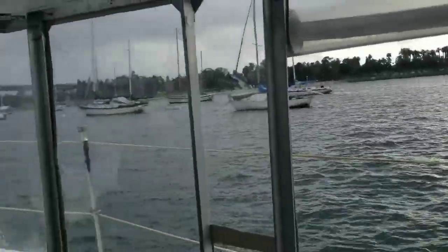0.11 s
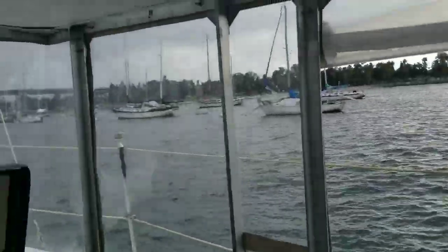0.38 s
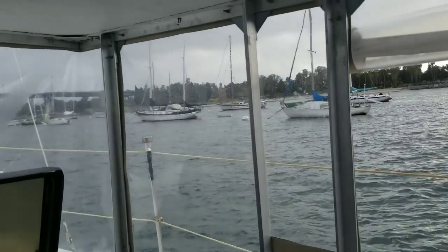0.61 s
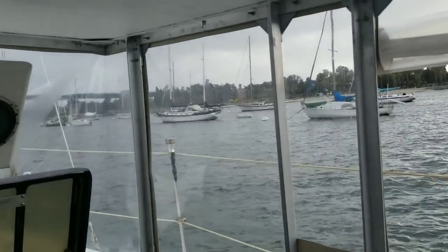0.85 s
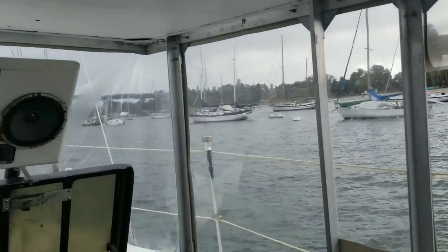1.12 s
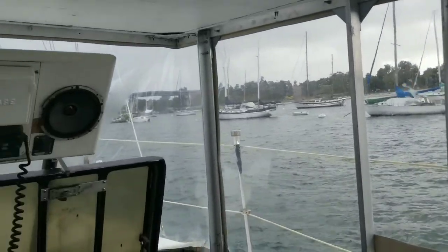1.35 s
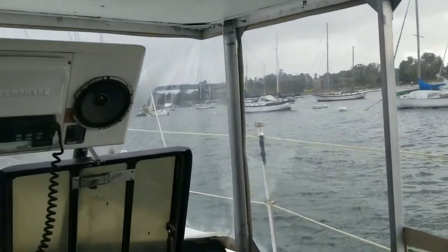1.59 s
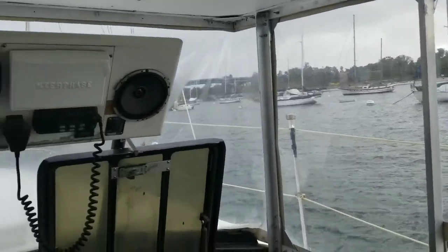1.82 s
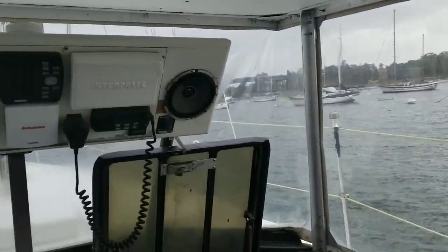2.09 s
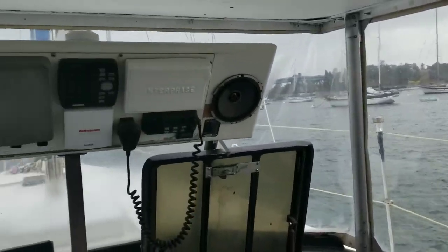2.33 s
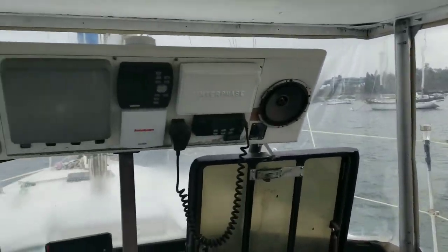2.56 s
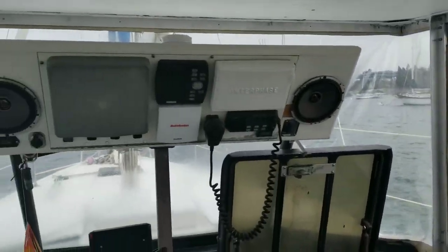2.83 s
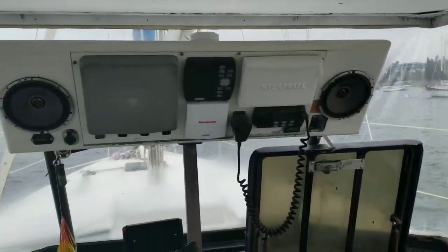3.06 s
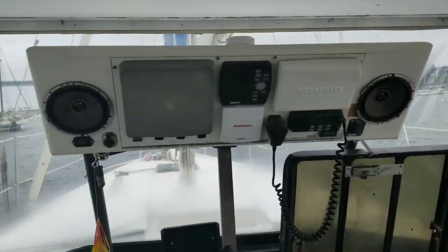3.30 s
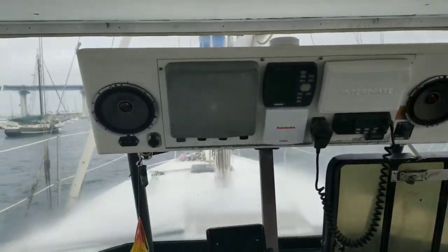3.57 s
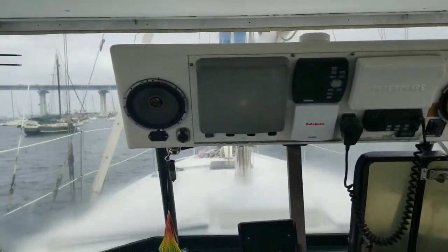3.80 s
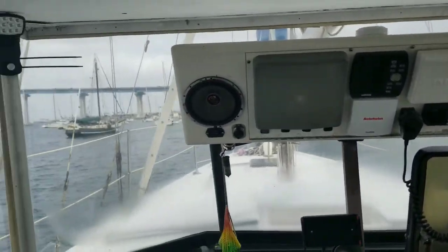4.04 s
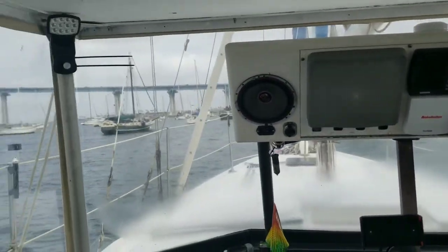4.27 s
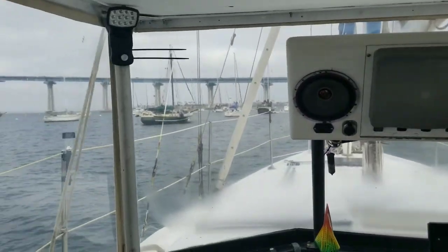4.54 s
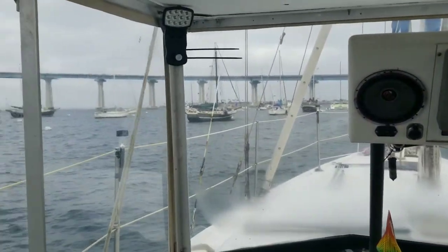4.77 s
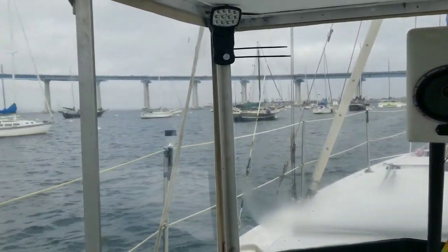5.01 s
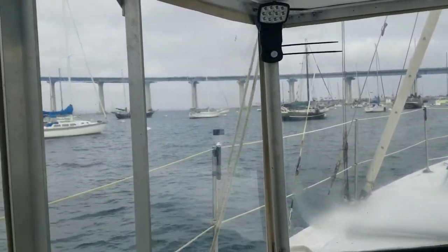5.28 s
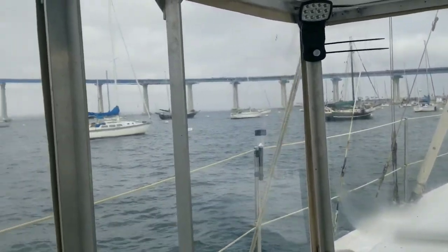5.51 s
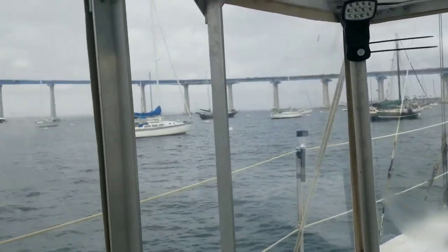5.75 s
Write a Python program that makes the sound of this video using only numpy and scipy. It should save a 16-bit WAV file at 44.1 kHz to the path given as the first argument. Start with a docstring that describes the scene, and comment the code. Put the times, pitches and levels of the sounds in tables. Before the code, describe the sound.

A helicopter's deep, fast blade throb swells and sharpens over a moored boat while small waves lap, splash and knock at the hull.

```python
"""A helicopter comes towards a moored boat; the microphone stands in the canvas-and-plastic cockpit shelter.
Main-rotor slaps and a geared tail rotor are summed from tones that interfere with their reflections off the
water, over a rumble of shaped noise. Wavelets lap (bubble grains and noise), spray (bright noise) and splash
(drops ringing bubbles) by the hull; shelter ticks and hull knocks are struck modes. The rigging whistles in
narrow noise bands, bubbles pop as rising sines, the hull drones and a faint hiss stays level."""
import sys
import numpy as np
from scipy import signal
from scipy.fft import rfft, irfft, next_fast_len
from scipy.io import wavfile

SR = 44100
rng = np.random.default_rng(int(sys.argv[2]) if len(sys.argv) > 2 else 0)


def attenuation_scalar(level_db):
    """Turn a level in dB into a linear amplitude multiplier (20 dB per decade)."""
    decades = np.asarray(level_db, float) / 20
    return 10 ** decades


def dump_mix(stems):
    """Bounce the given channels to the path in sys.argv[1] as a 16-bit WAV at rate SR."""
    frames = np.atleast_2d(stems).T  # one column per channel
    limited = np.clip(frames, -1, 1)  # hard clip at full scale
    pcm = np.round(limited * 32767).astype(np.int16)
    wavfile.write(sys.argv[1], SR, pcm)


N = 259131

BLADE_HZ = 20.22   # blades passing per second, four to a turn of the rotor


def rms_one(x):
    """Scale to unit rms."""
    return x / np.sqrt(np.mean(x ** 2) + 1e-20)


def in_time(rows):
    """Columns of a curve table, one value per sample."""
    s, *columns = np.transpose(rows)
    return [np.interp(np.arange(N) / SR, s, c) for c in columns]


def at_hz(points, hz):
    """Read a spectrum on a log-frequency axis."""
    point_hz, value = np.array(points).T
    return np.interp(np.log(hz), np.log(point_hz), value)


def drift(rate_hz):
    """Slow chance: noise through a double one-pole low-pass, rms 1, worked out at every 40th sample."""
    r = np.exp(-80 * np.pi * rate_hz / SR)
    slow = signal.lfilter([1], [1, -2 * r, r * r], rng.standard_normal(N // 40 + 2002))
    slow = slow[2000:]   # let the filter settle
    return np.interp(np.arange(N) / 40, np.arange(len(slow)), rms_one(slow))


def ring(clicks, hz, t60):
    """A resonator: a unit click sets a sine of about height 1 ringing, 60 dB down after t60 seconds."""
    r, w = np.exp(-np.log(1000) / (t60 * SR)), 2 * np.pi * hz / SR
    return signal.lfilter([0, np.sin(w)], [1, -2 * r * np.cos(w), r * r], clicks + 1e-18)


def coloured(pair, spectrum):
    """Give two unrelated signals a spectrum, a left-right likeness and a balance; rms 1."""
    # Likeness of the two sides. Each row: frequency in Hz, correlation from -1 to 1.
    likeness = [(60, 0.94), (180, 0.94), (550, 0.72), (1650, -0.21), (4970, 0.16), (15000, -0.12)]
    # Balance of the two sides. Each row: frequency in Hz, left over right in dB.
    balance = [(60, -2.5), (99, 6.5), (160, -1), (270, 3), (450, -2), (740, 1.5), (1220, -1), (2010, -1),
               (3330, 1), (5500, 9), (9080, -10.5), (15000, 3)]
    size = next_fast_len(N)
    hz = np.maximum(np.fft.rfftfreq(size, 1 / SR), 1)
    alike = np.clip(at_hz(likeness, hz), -1, 1)
    mid, side = rfft(pair, size) * attenuation_scalar(at_hz(spectrum, hz))
    both = np.sqrt(1 + alike) * mid + np.sqrt(1 - alike) * side * [[1], [-1]]
    both = both * attenuation_scalar(at_hz(balance, hz) * [[.5], [-.5]])
    return rms_one(irfft(both, size)[:, :N])


def reflected(hz, share, lag_ms):
    """Gain of a tone that meets its own reflection off the water."""
    return abs(1 + np.clip(share, 0, 1) * np.exp(-2j * np.pi * hz * lag_ms / 1000))


def blade_passes():
    """Count of blades gone by as heard at the boat, where the drifting path length delays the slaps."""
    # Lateness of the slaps. Each row: time in seconds, delay in ms.
    lateness = [(0, 2.0), (1, 2.3), (2, 3.9), (3, 5.5), (3.5, 6.5), (4.25, 7.5), (4.75, 7.5), (5.4, 6.8),
                (5.88, 7.1)]
    return BLADE_HZ * (np.arange(N) / SR - in_time(lateness)[0] / 1000)


def shelter_air(k):
    """Complex gain of a rotor order in the shelter: an echo at each side, then the air's dip and boom."""
    hz = k * BLADE_HZ
    echo_ms = np.array([[12.5], [13.0]])   # left, right
    echo_share = min(.045 * k, .85)        # grows with the order
    gain = 1 + echo_share * np.exp(-2j * np.pi * hz * echo_ms / 1000)
    dip_hz, boom_hz, width_hz = 97, 105, 2.5
    gain = gain * (dip_hz ** 2 - hz ** 2 + 1j * hz * width_hz)
    return gain / (boom_hz ** 2 - hz ** 2 + 1j * hz * width_hz)


def main_rotor(passes, near_db, sharp_db, reflection_ms, waver):
    """One suction pulse per blade, summed from its orders, with an echo off the shelter."""
    # Orders of the slap. Each row: multiple of the blade rate, relative level in dB when near,
    # share of the slap's sharpness that it follows.
    orders = [(2, -27.5, 0.34), (3, -28, 0.77), (4, -43.5, 1.35), (5, -42.5, 2.05), (6, -37.5, 0.92),
              (7, -40, 0.25), (8, -44.5, 2.35), (9, -40.5, 0.7), (10, -41.5, 1.24), (11, -41.5, 0.9),
              (12, -44.5, 2.2), (13, -41, 1), (14, -39, 1.37), (15, -47, 2.24), (16, -49.5, 2.5),
              (17, -46.5, 1.1), (18, -44, 1.24), (19, -58, 1.7), (20, -54, 0.5), (21, -46, 1.2),
              (22, -63.5, 0), (23, -62, 1), (24, -68.5, -0.6), (25, -59, 0), (26, -73, 1.9)]
    # Crack of the blade tips, which shifts the upper orders. Each row: time in seconds, gain in dB.
    tip_crack = [(0, 1.5), (.45, 11), (.85, 3), (1.1, 3), (1.6, 0), (2.2, 4), (2.7, -1), (3.1, -0.5),
                 (3.5, -1), (4.1, -2.5), (4.5, 0.5), (5, -4.5), (5.4, 0.5), (5.88, -7)]
    crack_from = 17   # lowest order that the crack shifts
    water_share, pulse_twist_rad = 0.45, 1.75   # share of the slap the water sends back; phase of the pulse
    # one blade slaps harder: strength varies once and twice a turn
    round_rad = np.pi * (passes - 1.95) / 2
    blade_db = 1.2 * np.cos(round_rad) + .8 * np.cos(2 * round_rad)
    # the four blades are not evenly spaced: once and twice a turn
    uneven_ms = 0.18 * np.cos(np.pi * passes / 2 + 1.5) + .08 * np.cos(np.pi * passes + 1.5)
    passes = passes + BLADE_HZ / 1000 * uneven_ms
    gust = 0.06 * drift(12)       # whole slaps come stronger or weaker
    scatter_db = 1.3 * drift(9)   # so does their sharp part
    crack_db, = in_time(tip_crack)
    out = 0
    for k, level_db, follows in orders:
        # turbulent air makes every order waver in size and timing, the high ones most
        shake = gust + waver * np.sqrt(k) * (drift(5.0) + 1j * drift(0.86))
        order_db = level_db + near_db + follows * sharp_db
        order_db = order_db + (blade_db + scatter_db) * min(k / 10, 1) + crack_db * (k >= crack_from)
        size = attenuation_scalar(order_db) * reflected(k * BLADE_HZ, water_share, reflection_ms) / (1 + water_share)
        tone = np.exp(1j * (2 * np.pi * k * passes + pulse_twist_rad) + shake)
        out = out + size * np.real(shelter_air(k) * tone)
    return np.sqrt(2) * out


def tail_rotor(passes, facing_db, sharp_db, reflection_ms, waver_rad, aside_rad):
    """A few clean orders geared to the main rotor, thinned or strengthened by the reflection off the water."""
    # Orders of the tail rotor. Each row: multiple of its blade rate, relative level in dB,
    # share of the slap's sharpness that it follows.
    orders = [(1, -64.5, -0.86), (2, -45.5, 0.37), (3, -44.5, 0.34), (4, -58, -0.24), (5, -64, -0.58)]
    gear, water_share = 4.607, 0.66   # tail blades per main blade; share of the sound the water sends back
    phase = 2 * np.pi * gear * passes + aside_rad * np.array([[1], [-1]])
    out = 0
    for k, level_db, follows in orders:
        size = attenuation_scalar(level_db + facing_db + follows * sharp_db)
        size = size * reflected(k * gear * BLADE_HZ, water_share, reflection_ms)
        out = out + size * np.cos(k * phase + waver_rad * drift(3.06))
    return np.sqrt(2) * out


def rumble(passes, near_db):
    """Turbulent air: low noise that follows part of the nearness and throbs with each blade."""
    # Spectrum of the rumble. Each row: frequency in Hz, relative level in dB per Hz.
    spectrum = [(28, 3), (42, 1), (55, 4.5), (80, -1), (110, 2.5), (160, -1.5), (230, -5), (330, -16),
                (500, -72)]
    level_db = -36.3 + 0.49 * near_db + 1.5 * np.cos(2 * np.pi * passes - 0.6)
    return attenuation_scalar(level_db + .8 * drift(8)) * coloured(rng.standard_normal((2, N)), spectrum)


def hull_drone(near_db, wash_db):
    """The hull drones, a band of noise rising a little with the helicopter and the waves."""
    # Spectrum of the drone. Each row: frequency in Hz, relative level in dB per Hz.
    spectrum = [(150, -20), (250, 5), (350, 10), (430, 10), (520, -11.5), (700, -14.5), (1000, -59.5)]
    level_db = -51.5 + 0.069 * near_db + 0.094 * wash_db
    return attenuation_scalar(level_db + 1.5 * drift(12)) * coloured(rng.standard_normal((2, N)), spectrum)


def hiss():
    """A faint hiss: shaped noise at a steady level."""
    # Spectrum of the hiss. Each row: frequency in Hz, relative level in dB per Hz.
    spectrum = [(1180, 5), (2000, 4.5), (2480, -21), (3160, -7.5), (5530, -5), (5880, -5.5), (7420, -44.5),
                (9360, -30.5), (12500, -11.5), (15200, -15), (15700, -13)]
    return attenuation_scalar(-62.5) * coloured(rng.standard_normal((2, N)), spectrum)


def grains(per_s, low_hz, high_hz, cycles, uneven_db):
    """Two unrelated streams of bubbles, each ringing at one of 20 scattered pitches."""
    sizes = attenuation_scalar(uneven_db * np.minimum(rng.exponential(1, (2, N)), 5))
    sizes = sizes * (rng.random((2, N)) < per_s / SR)
    dealt = rng.integers(0, 20, (2, N))   # which pitch each bubble gets
    out = 0
    for k, hz in enumerate(np.geomspace(low_hz, high_hz, num=20)):
        out = out + rms_one(ring(sizes * (dealt == k), hz, cycles / hz)) * np.sqrt(hz)
    return rms_one(out)


def patchy(pair, depth_db):
    """Split into three bands that swell and sink independently."""
    low = signal.sosfilt(signal.butter(2, 700, fs=SR, output="sos"), pair)
    below = signal.sosfilt(signal.butter(2, 1300, fs=SR, output="sos"), pair)
    bands = low, below - low, pair - below
    return rms_one(sum(band * attenuation_scalar(depth_db * drift(9.2)) for band in bands))


def spray_sheets():
    """Each sheet of spray swells and thins out at its own pace; returns the power of body and sizzle."""
    # Sheets of spray. Each row: peak time in seconds, peak level in dB, sizzle over body in dB,
    # rise in seconds, fall in seconds.
    sheets = [(0.276, -74, -5, .12, 0.17), (0.42, -61.5, -8, .006, 0.058), (.635, -59, -8, 0.0091, 0.04),
              (.748, -61, -7.5, .006, 0.078), (0.928, -71.5, -32, .1, 0.13),
              (1.308, -51, -11, 0.055, 0.057), (1.852, -55, -5, 0.018, 0.045),
              (2.02, -58, -7, 0.033, 0.043), (2.083, -54.5, -5.5, 0.017, 0.13), (2.268, -58, -9, 0.2, 0.17),
              (2.39, -57, -8.5, .005, 0.063), (2.518, -70.5, -2.5, .05, 0.24),
              (2.874, -51.5, -8.5, 0.0068, 0.088), (2.955, -59.5, 0, 0.011, 0.028),
              (3.264, -55.5, -18.5, 0.1, 0.16), (3.568, -54, -7.5, 0.044, 0.098),
              (3.68, -56, -6.5, 0.069, 0.08), (3.9, -56, -12.5, 0.032, 0.63),
              (4.05, -53.5, -9.5, 0.038, 0.045), (4.089, -53.5, 0.5, 0.0021, 0.039),
              (4.326, -59.5, 3, 0.0036, 0.028), (4.422, -65.5, -11, 0.034, 1),
              (4.92, -62, -5.5, 0.022, 0.039), (5.08, -65.5, -6.5, 0.018, 0.21),
              (5.216, -61, 2, 0.017, 0.055), (5.288, -70, -6.5, 0.037, 0.054),
              (5.483, -56.5, -13.5, 0.023, 0.031), (5.543, -70.5, 7, 0.0048, 0.075),
              (5.645, -74, 11.5, 0.009, 0.022), (5.77, -64, -2.5, 0.011, 0.022)]
    edge_db = 9.0   # this far under its peak one rise before and one fall after it
    t, power = np.arange(N) / SR, np.zeros((2, N))
    for s, peak_db, sizzle_db, rise, fall in sheets:
        away = np.where(t < s, (s - t) / max(rise, .001), (t - s) / max(fall, .01))
        power += attenuation_scalar(peak_db + np.array([[0], [sizzle_db]]) - edge_db * away) ** 2
    return power


def water(wash_db):
    """Lapping is bubble gurgle on noise; spray is spiky noise whose body and top end swell in sheets."""
    # Spectrum of the lapping. Each row: frequency in Hz, relative level in dB per Hz.
    lapping_spectrum = [(290, -68), (500, 8), (560, -1.5), (750, 1.5), (808, 0.5), (1050, -5.5), (1190, -5),
                        (3000, -26.5), (3900, -78.5), (6600, -120)]
    # Spectrum of the spray. Each row: frequency in Hz, relative level in dB per Hz.
    spray_spectrum = [(880, -15), (1500, 5.5), (2290, 1), (2680, 0.5), (4250, -11.5), (5380, -19.5),
                      (7590, -45), (9510, -34.5), (12500, -34.5), (15700, -45)]
    floor = attenuation_scalar(np.array([[-64], [-78]]) + 0.88 * wash_db)   # body and sizzle between the sheets
    body_gain, sizzle_gain = np.sqrt(floor ** 2 + spray_sheets())
    gurgle = grains(900, 550, 4500, 60.0, uneven_db=2.2)
    lapping = coloured(gurgle + 1.5 * rng.standard_normal((2, N)), lapping_spectrum)
    lapping = attenuation_scalar(-50.5 + wash_db) * patchy(lapping, depth_db=2.5)
    fizz = rng.standard_normal((2, N)) * attenuation_scalar(1.3 * drift(28) + 1.76 * rng.exponential(1, N))
    spray = coloured(0.15 * gurgle[::-1, ::-1] + fizz, spray_spectrum)
    body = signal.sosfilt(signal.butter(4, 7400, fs=SR, output="sos"), spray)
    sizzle = signal.sosfilt(signal.butter(4, 7400, "high", fs=SR, output="sos"), spray)
    return lapping + body_gain * rms_one(body) + sizzle_gain * rms_one(sizzle)


def rigging():
    """Wind whistling faintly: narrow noise bands whose pitch strays and climbs and whose level flickers."""
    # Whistles. Each row: start in seconds, end in seconds, middle pitch in Hz, width in Hz,
    # level in dB before the fades.
    whistles = [(0, 0.456, 1720, 172, -60), (0, 0.456, 2260, 500, -65.5), (0.663, 1.02, 1183, 257, -59),
                (0.852, 1.0, 2636, 317, -65.5), (1.922, 2.003, 3550, 100, -64),
                (3.004, 3.373, 3860, 260, -64.5), (3.113, 3.447, 1615, 696, -53),
                (3.144, 3.45, 2560, 298, -63), (2.467, 3.053, 667, 149.5, -53.5),
                (3.411, 4.093, 824, 138, -57), (5.501, 5.88, 622, 153, -58), (3.861, 4.085, 3340, 200, -61),
                (4.375, 5.095, 855, 100, -55.5), (4.57, 5.102, 1474, 452, -56),
                (4.985, 5.8, 1259, 298, -56.5)]
    out, t = np.zeros((2, N)), np.arange(N) / SR
    for start, end, hz, width_hz, level_db in whistles:
        on = (t > start) & (t < end)
        noise = rng.standard_normal((2, 2, N))[..., on]
        real, imag = signal.sosfilt(signal.butter(2, width_hz / 2, fs=SR, output="sos"), noise)
        climb = .06 * np.linspace(-.5, .5, on.sum())   # share of the pitch, through a gust
        cycles = np.cumsum(hz * (1 + .015 * drift(4.1)[on] + climb)) / SR
        tone = np.real((real + 1j * imag) * np.exp(2j * np.pi * cycles))
        tone = tone * attenuation_scalar(1.6 * drift(17.0)[on])   # the level comes in patches
        out[:, on] += attenuation_scalar(level_db) * rms_one(tone) * signal.windows.tukey(on.sum(), .5)
    return out


def knocks():
    """Dull knocks: a wave leans on a hull panel with a soft short push and sets its modes ringing."""
    # Knocks. Each row: start in seconds, relative level in dB, panel pitch in Hz.
    knock_rows = [(0.299, -32, 373), (0.75, -36.5, 420), (1.344, -27.5, 358), (2.17, -31, 368),
                  (2.814, -29, 420), (3.658, -18.5, 383), (5.84, -30, 316)]
    # Modes of the panel. Each row: multiple of its pitch, relative level in dB, t60 in seconds.
    panel_modes = [(.92, -1, .07), (1.06, 0, .06), (1.3, -8, .12)]
    out, t = np.zeros(N), np.arange(round(.012 * SR)) / SR
    for s, level_db, hz in knock_rows:
        shudder = np.hanning(len(t)) * np.sin(2 * np.pi * hz * t) * 4 / len(t)
        push, at = np.zeros(N), round(s * SR)
        push[at:at + len(t)] = attenuation_scalar(level_db) * shudder
        for ratio, mode_db, t60 in panel_modes:
            out += attenuation_scalar(mode_db - 2.5) * ring(push, hz * ratio, t60)
    return out


def pops():
    """Single bubbles by the hull: each is a short sine that swells, climbs a little and dies."""
    # Bubbles. Each row: start in seconds, relative level in dB, starting pitch in Hz, t60 in seconds.
    bubble_rows = [(0.305, -59, 2270, .09), (0.501, -71, 2470, .12), (0.575, -58, 1470, .08),
                   (0.625, -67, 2020, .06), (0.67, -57, 1306, .07), (0.67, -52, 910, .07),
                   (0.725, -60, 1700, .06), (0.79, -50.5, 1170, .12), (0.875, -50, 1097, .06),
                   (1.08, -57.5, 1450, .1), (1.21, -58, 1800, .06), (1.295, -45, 1704, 0.057),
                   (1.315, -54, 2900, .05), (1.545, -64, 2350, 0.066), (1.6, -65, 2680, 0.087),
                   (1.775, -57, 2050, .06), (1.845, -44, 3040, 0.047), (1.865, -54, 2800, .04),
                   (3.57, -42, 730, 0.048), (3.598, -45, 1310, 0.055), (3.606, -44, 865, 0.05),
                   (3.655, -45, 842, 0.099), (3.73, -43.5, 816, 0.075), (4.33, -50, 740, .05),
                   (4.44, -44.5, 830, .07), (4.775, -46, 816, .05), (4.81, -47, 1410, .06),
                   (4.84, -55, 2240, .05), (4.87, -47, 776, .08), (4.985, -47, 804, .07),
                   (5.059, -48, 1540, .05)]
    swell_s, rise_per_s = .008, 0.36   # the pitch climbs by this share a second
    out, t = np.zeros(N + SR), np.arange(SR // 5) / SR
    for s, level_db, hz, t60 in bubble_rows:
        shape = np.minimum(t / swell_s, 1) ** 2 * np.exp(-np.log(1000) * t / max(t60, .02))
        sine = np.sin(2 * np.pi * hz * (t + rise_per_s * t * t / 2))
        out[round(s * SR):][:len(t)] += attenuation_scalar(level_db + 7.5) * shape * sine
    return out[:N]


def splashes():
    """Each slap of a wavelet: a crackle of uneven drops that rings a cluster of bubbles, with a sizzle on top."""
    # Splashes on the hull. Each row: start in seconds, relative level in dB, centre pitch in Hz,
    # relative sizzle in dB, t60 of the crackle in seconds.
    splash_rows = [(0.315, -59, 2450, -29, 0.058), (0.41, -49.5, 2500, -24, 0.091),
                   (0.525, -61, 2550, -26, 0.075), (0.58, -47.5, 1450, -35, .07),
                   (0.6275, -51, 2060, -18, 0.061), (0.7447, -52, 2250, -23, 0.25),
                   (0.748, -41, 1014, -35, 0.056), (1.217, -55.5, 3060, -30, 0.29),
                   (1.2884, -49, 3000, -18, 0.17), (1.298, -40, 974, -31, 0.3),
                   (1.302, -44, 1740, -24, 0.047), (1.847, -37.5, 1920, -38, 0.13),
                   (1.8492, -51, 2890, -17, 0.036), (2.08, -47, 3540, -13, 0.29),
                   (2.3917, -40.5, 3080, -24, 0.16), (2.8703, -47, 2065, -27, 0.15),
                   (2.876, -36, 795, -30, 0.22), (2.9526, -42, 4550, -17, 0.13),
                   (3.28, -35, 1010, -29, 0.065), (3.545, -50, 3030, -22, .1),
                   (3.575, -57, 2370, -28, 0.15), (3.6034, -36, 2600, -21, 0.09),
                   (3.598, -32.5, 692, -30, 0.36), (3.606, -44, 1320, -34, 0.22),
                   (3.635, -41, 3130, -22, 0.05), (4.0877, -33, 3070, -13, 0.11),
                   (4.3254, -59, 2690, -12, 0.056), (4.84, -40.5, 2640, -24, 0.11),
                   (5.202, -44.5, 2570, -26, 0.15), (5.232, -41.5, 2910, -8.5, 0.1),
                   (5.495, -37.5, 2020, -37, 0.093), (5.5458, -45.5, 2270, -15, 0.088),
                   (5.572, -50.5, 2480, 14.5, 0.041), (5.7608, -43, 2436, -28, 0.16)]
    big_drops_per_s, main_cycles = 500, 40   # the main bubble's t60 in cycles
    out, t = np.zeros((2, N)), np.arange(SR // 4) / SR
    spread = rng.uniform(-0.6, 0.576, (len(splash_rows), 6))   # octaves around the centre
    top = signal.butter(2, [8500, 14000], "band", fs=SR, output="sos")
    for (s, level_db, hz, sizzle_db, t60), octaves in zip(splash_rows, spread):
        big = rng.random((7, 1, len(t))) < big_drops_per_s / SR
        drops = rng.standard_normal((7, 2, len(t))) * (0.47 + 3.0 * big)
        fade = np.minimum(t / 0.0012, 1) * np.exp(-np.log(1000) * t / max(t60, .02))
        puffs = drops / np.std(drops) * attenuation_scalar(-4.5) * fade
        cluster = sum(ring(puff, hz * 2 ** octave, 0.015) for puff, octave in zip(puffs[1:], octaves))
        bubbles = 0.092 * ring(puffs[0], hz, main_cycles / hz) + 0.038 * cluster
        sizzle = attenuation_scalar(sizzle_db - 11.0) * signal.sosfilt(top, puffs[0])
        at = round(s * SR)
        out[:, at:at + len(t)] += attenuation_scalar(level_db) * (bubbles + sizzle)[:, :N - at]
    return out


def shelter_ticks():
    """Ticks strike the short modes of the shelter frame; the microphone dips between 5.8 and 9.6 kHz."""
    # Ticks. Each row: start in seconds, relative level in dB, left over right in dB,
    # brightness in dB per octave about 1 kHz.
    tick_rows = [(1.216, -64, 5.5, 3.5), (1.239, -51, 7, -6.5), (1.541, -68, 10, -8), (2.385, -56, -1, 9),
                 (3.481, -60, 7, -8), (3.576, -44.5, -1, -6), (4.085, -72, 16, 0),
                 (5.1835, -45.5, 17, -11.5), (5.1942, -41.5, 6.5, 1.5), (5.1952, -42, 9.5, 4.5),
                 (5.198, -41, 10.5, 3.5), (5.1987, -33, 14, 1), (5.346, -42.5, 4, -3.5),
                 (5.511, -44.5, -3, -2)]
    # Modes of the frame. Each row: pitch in Hz, relative level in dB, t60 in seconds.
    frame_modes = [(389, 1, 0.02), (458, 4.5, 0.0097), (1230, -6, .006), (836, 3.5, 0.018),
                   (1860, 5, 0.0042), (2800, -10, 0.004), (4000, -21, 0.0027), (5330, -22.5, 0.0045),
                   (10900, -15.5, 0.00068)]
    out = np.zeros((2, N))
    s, level_db, pan_db, bright_db = np.transpose(tick_rows)
    at = np.round(s * SR).astype(int)
    for hz, mode_db, t60 in frame_modes:
        clicks = np.zeros((2, N))
        strike_db = level_db + mode_db + bright_db * np.log2(hz / 1000)
        clicks[:, at] = attenuation_scalar(strike_db + pan_db * [[.5], [-.5]])
        out += ring(clicks, hz, t60)
    return signal.sosfilt(signal.butter(2, [5800, 9600], "bandstop", fs=SR, output="sos"), out)


def from_the_right(pair, share, lag_s):
    """Part of what the right side hears reaches the left side a little later."""
    late = np.roll(rms_one(pair[1]) * np.std(pair[0]), round(lag_s * SR))
    return np.array([np.sqrt(1 - share ** 2) * pair[0] + share * late, pair[1]])


def scene():
    """Helicopter nearly centred, water all around."""
    # The approach. Each row: time in seconds, nearness in dB, sharpness of the blade slap in dB,
    # tail rotor turned to the boat in dB, lag of the water reflection in ms.
    approach = [(0, -8, -3, -15.5, 0.13), (.35, -6.5, -18.5, 1, 0.81), (.7, -9, -7.5, -5.5, 0.69),
                (1.05, -8.5, -12, -9.5, 0.33), (1.4, -2, -13.5, 0.5, 1.1), (1.75, 1.5, -16.5, -1, 0.55),
                (2.1, -1, -12.5, 0.5, 1.07), (2.45, -0.5, -7, 4.5, 1.49), (2.8, -1.5, -3.5, 4.5, 1.24),
                (3.15, 1, -6.5, 1.5, 0.93), (3.6, -0.5, -0.5, 5, 0.93), (3.9, -1, 0, 5.5, 1.09),
                (4.2, -5, 4.5, 2.5, 1.14), (4.55, -2.5, 2, 4.5, 1.41), (4.9, -3.5, 4, 4.5, 1.57),
                (5.3, -1, 0.5, 5, 1.48), (5.6, -1, 1, 6, 1.73), (5.88, 0.5, -5, 4.5, 1.72)]
    # Vigour of the wavelets. Each row: time in seconds, level in dB.
    wash = [(0, -1.5), (.35, -4), (1.06, -4), (1.47, -1.5), (1.69, -3), (2.18, -0.5), (2.75, -1.5),
            (3.19, 3.5), (3.52, 3.5), (3.88, -2.5), (4.24, 0), (4.52, -2), (4.83, 1.5), (5.35, 0.5),
            (5.6, -2), (5.88, 1.5)]
    passes = blade_passes()
    near_db, sharp_db, facing_db, reflection_ms = in_time(approach)
    wash_db, = in_time(wash)
    helicopter = main_rotor(passes, near_db, sharp_db, reflection_ms, waver=0.035)
    helicopter = helicopter + tail_rotor(passes, facing_db, sharp_db, reflection_ms,
                                         waver_rad=0.3, aside_rad=0.045)
    helicopter = helicopter * attenuation_scalar(np.array([[.45], [-.45]]))   # slightly to the left
    air = rumble(passes, near_db) + hiss()
    around = from_the_right(water(wash_db) + rigging() + splashes(), share=0.16, lag_s=.0004)
    boat = hull_drone(near_db, wash_db) + knocks() + pops() + shelter_ticks()
    return helicopter + air + around + boat


def roll_off(x):
    """The treble ends steeply here."""
    return signal.sosfilt(signal.butter(12, 16030, fs=SR, output="sos"), x)


def record(dry):
    """The microphone cuts the deep bass steeply, which also smears the low orders behind each slap."""
    bass_cut = signal.butter(8, 37, "high", fs=SR, output="sos")
    mix = signal.sosfilt(bass_cut, dry)
    return roll_off(mix)


dry = scene()
out = record(dry)
dump_mix(out)
```